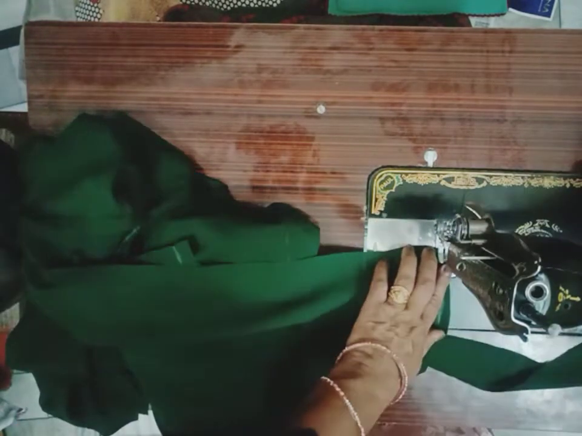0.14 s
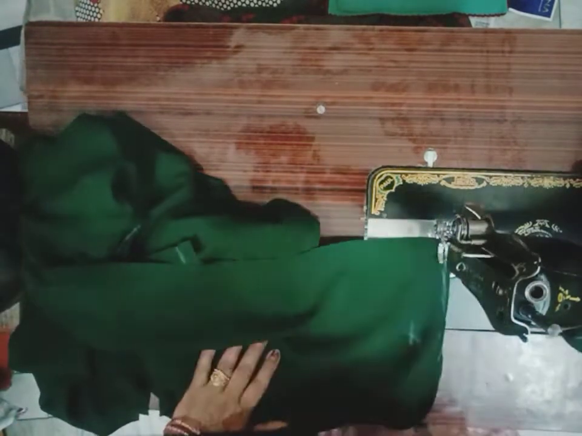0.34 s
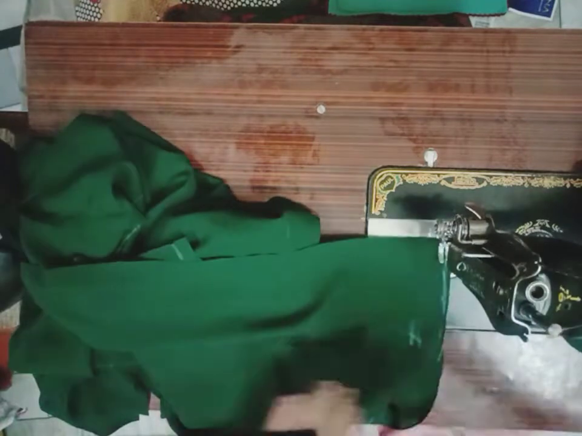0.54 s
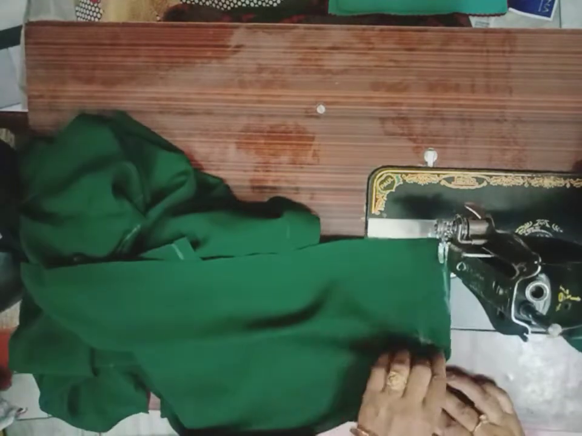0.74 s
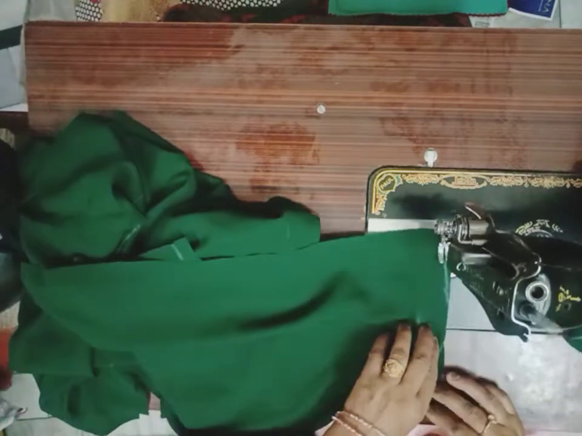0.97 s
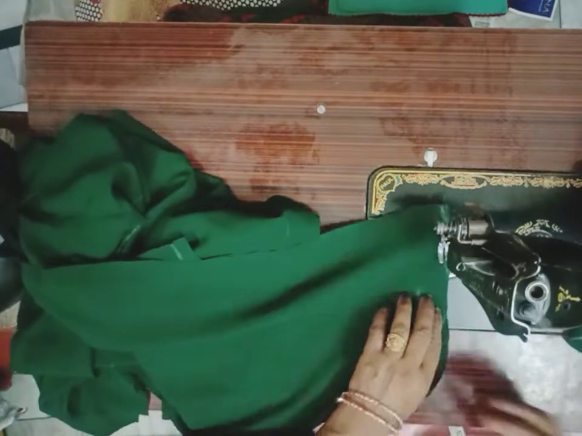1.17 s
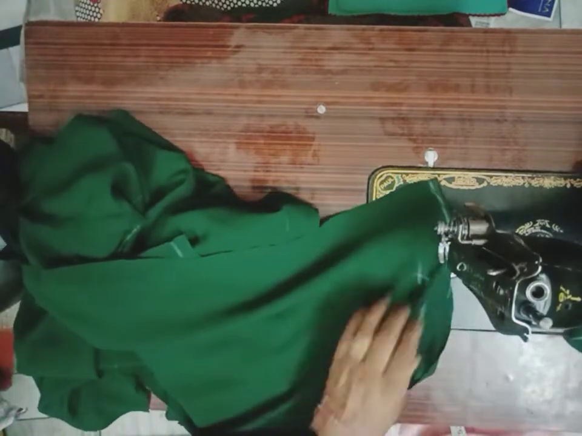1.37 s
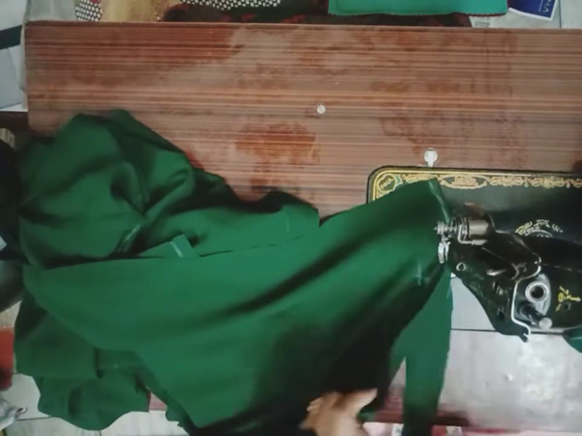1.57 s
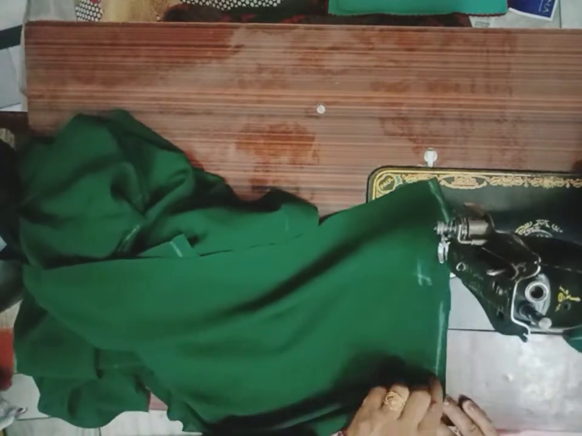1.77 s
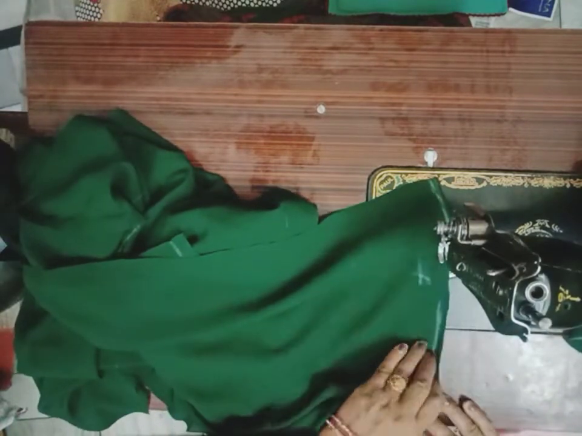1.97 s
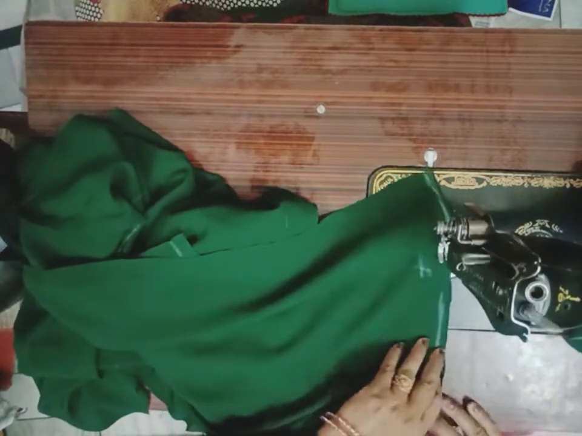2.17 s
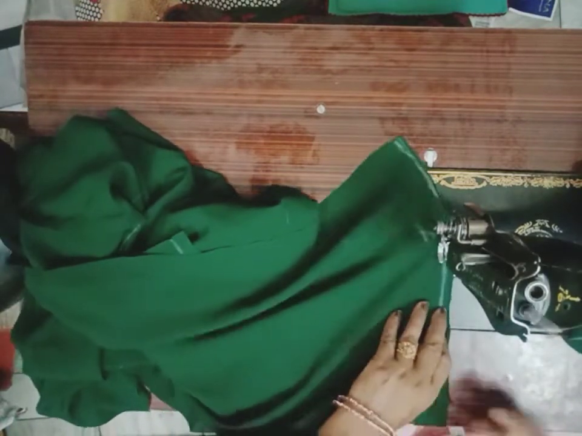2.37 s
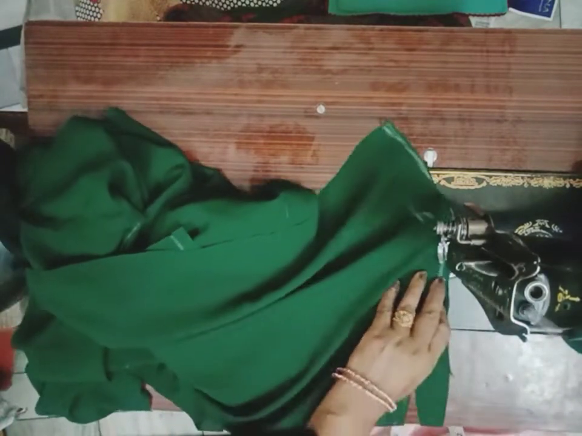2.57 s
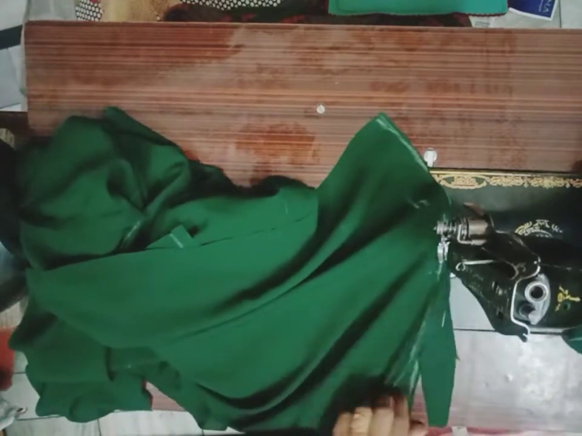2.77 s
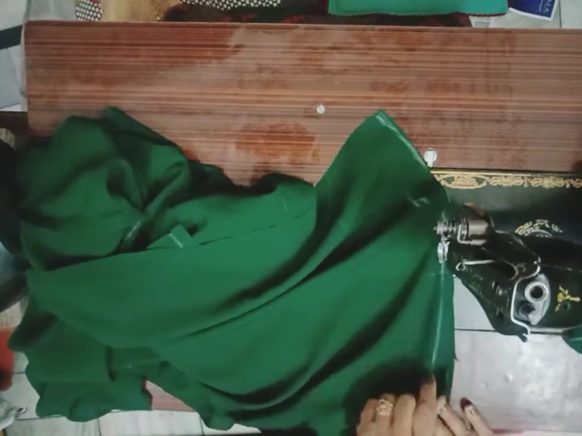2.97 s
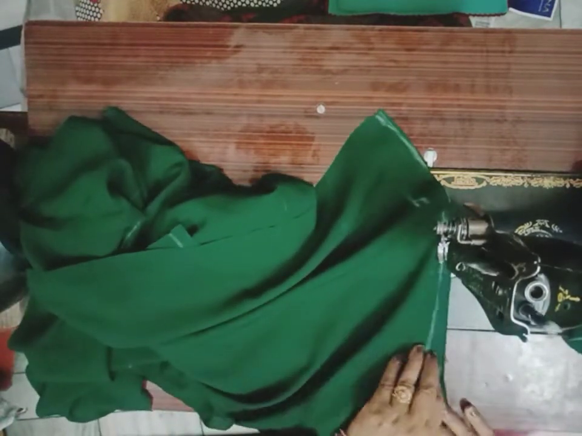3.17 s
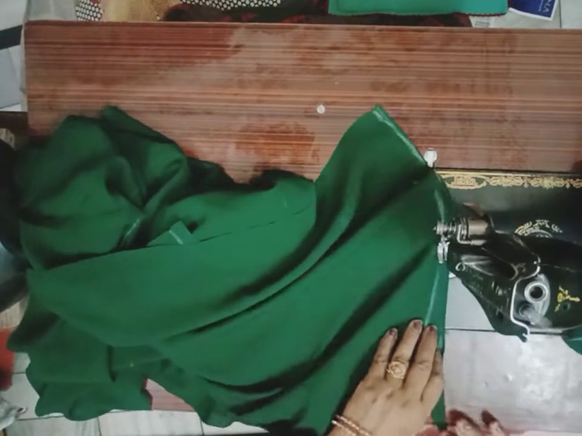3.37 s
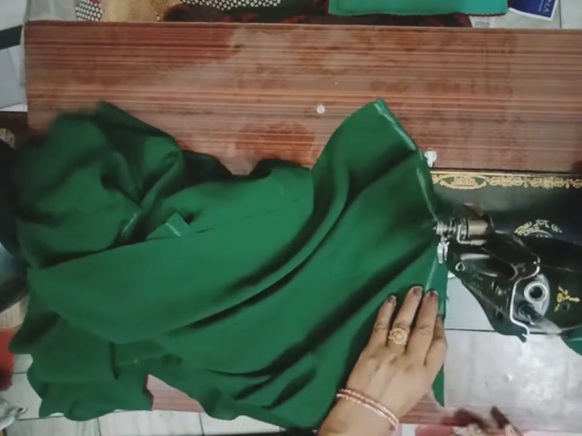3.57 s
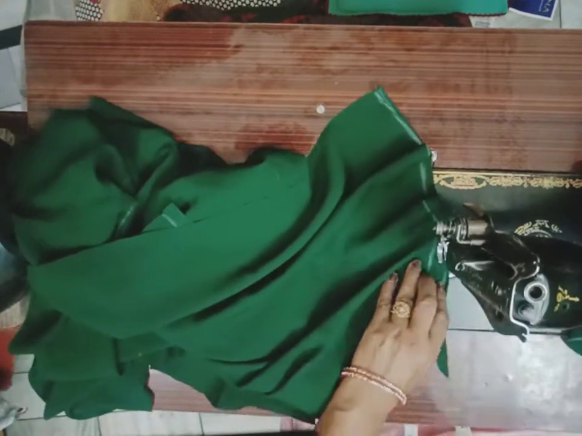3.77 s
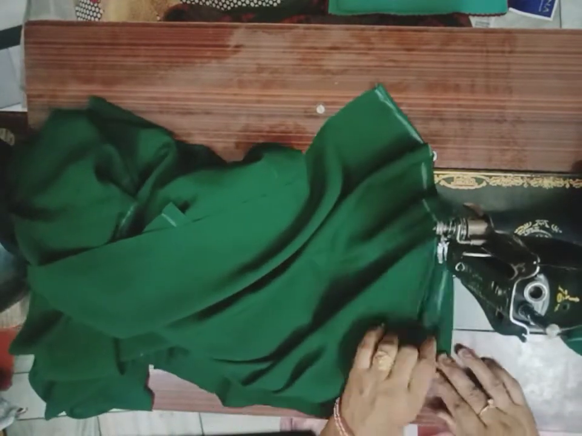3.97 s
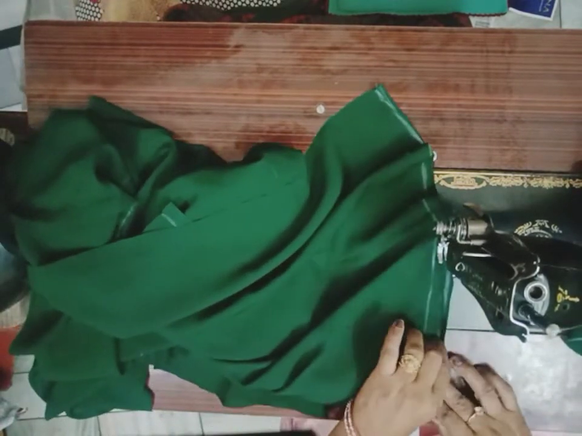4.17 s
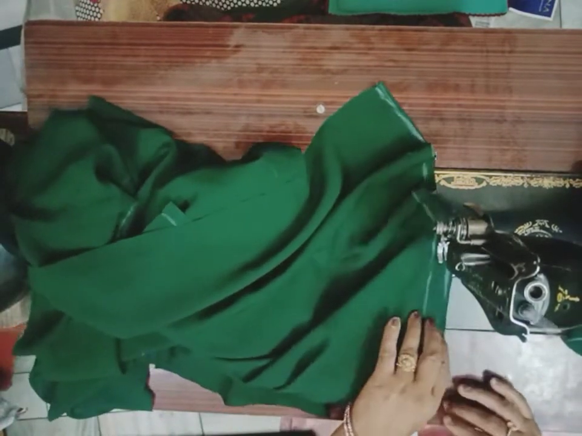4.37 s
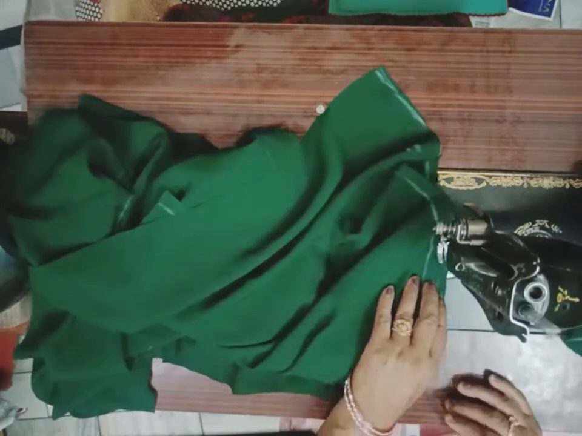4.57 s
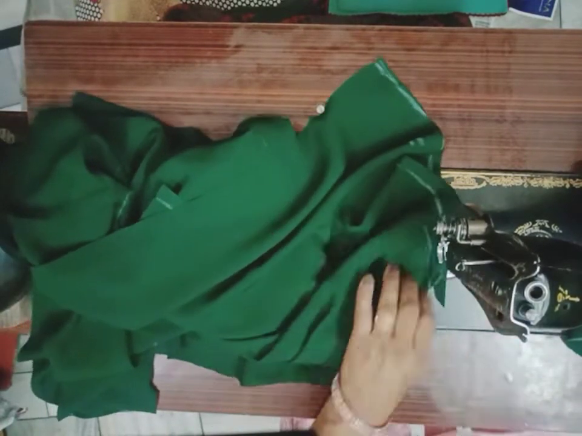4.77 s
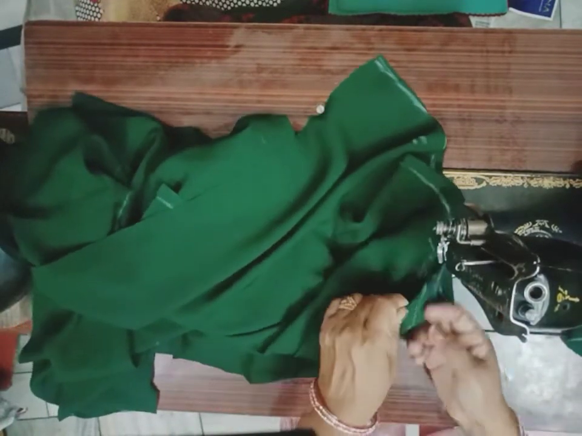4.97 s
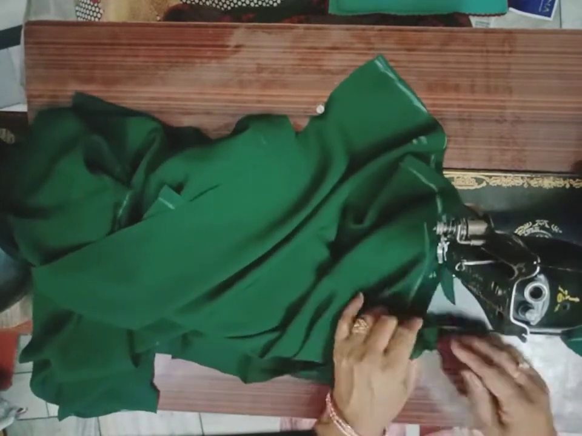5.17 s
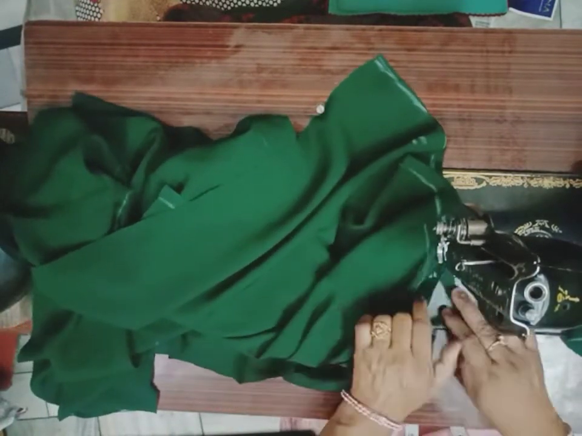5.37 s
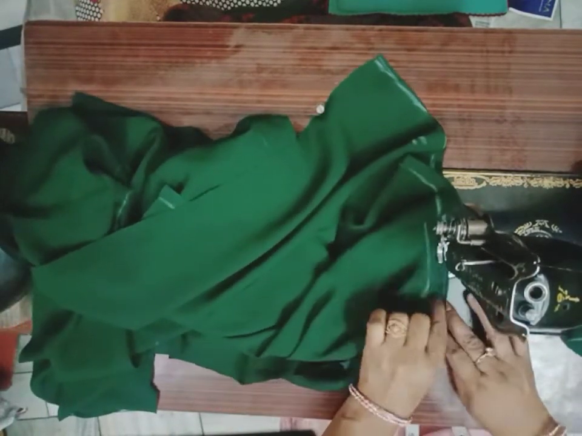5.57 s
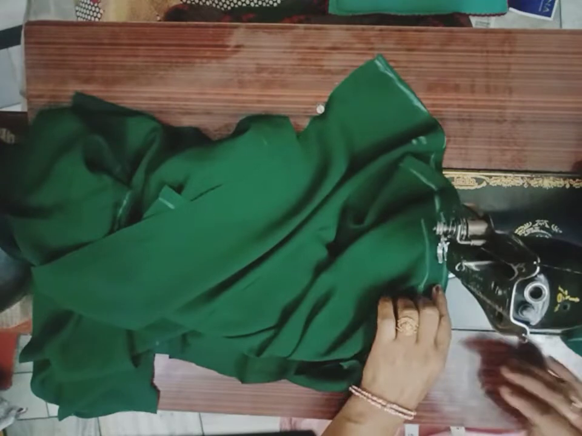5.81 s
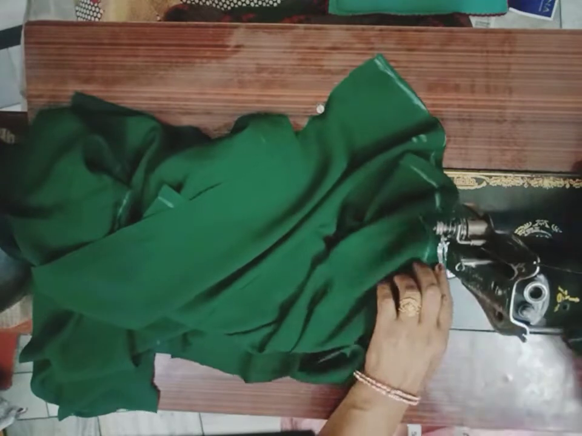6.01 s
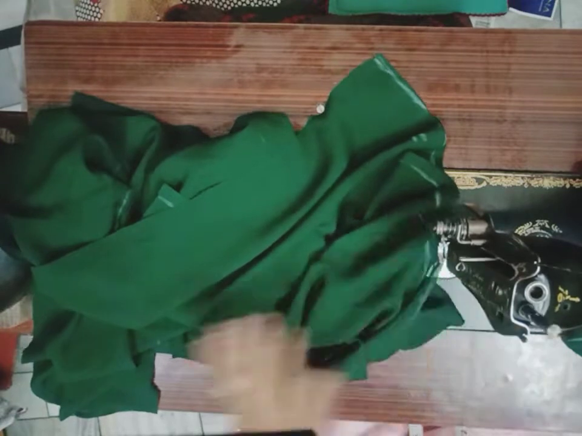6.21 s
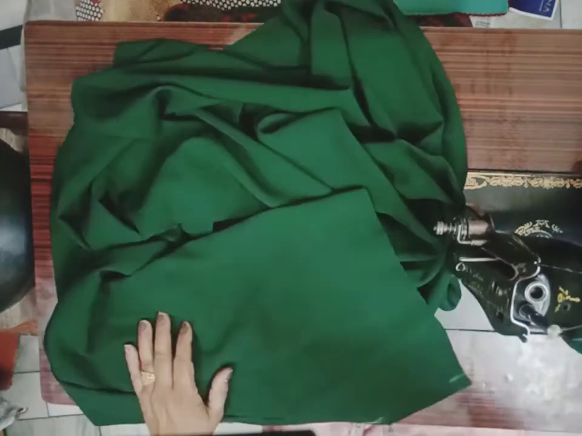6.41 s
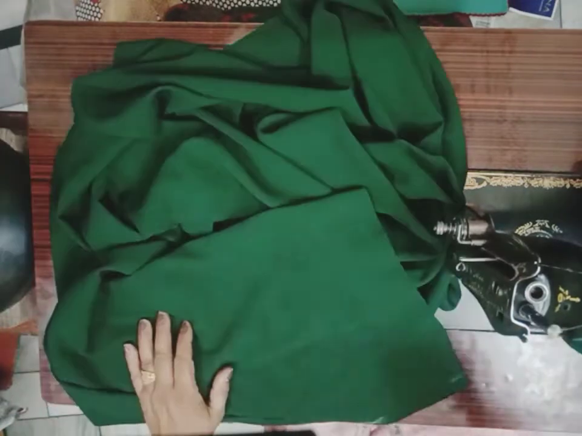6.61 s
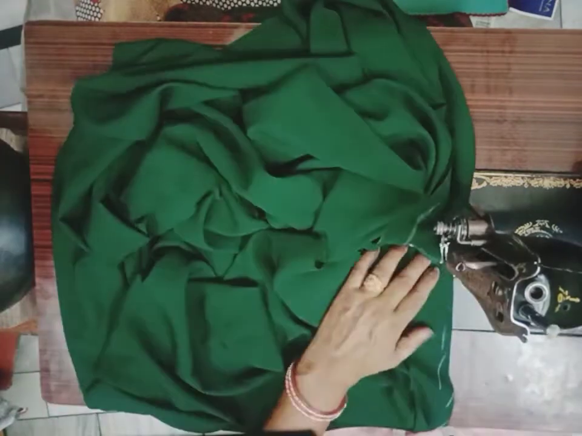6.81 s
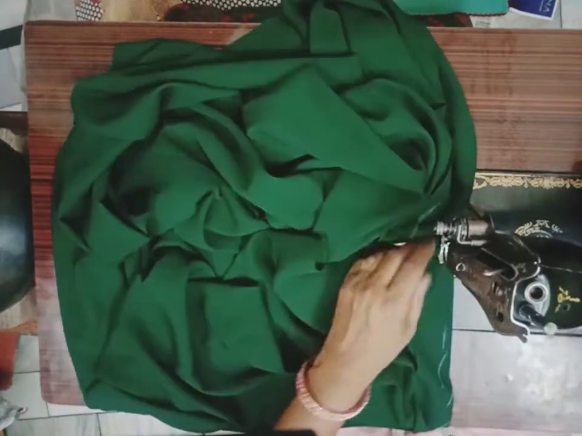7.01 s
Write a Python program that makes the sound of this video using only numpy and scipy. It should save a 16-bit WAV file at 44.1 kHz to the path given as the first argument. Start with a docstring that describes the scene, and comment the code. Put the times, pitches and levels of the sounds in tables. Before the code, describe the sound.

A motor-driven iron sewing machine stitches in five short clattering bursts, each starting with a low hum and ending in a dull knock, in a small room.

```python
"""A motor-driven iron sewing machine on a wooden table stitches in five short bursts, heard close up.
The motor hums as it strains to start; the machine breaks free, speeds up, coasts and stops with a dull knock.
Clacks of needle bar and shuttle shake steel parts and iron case, modelled as resonant bodies under noisy force.
A speed curve per burst scales the light strokes, loose rattle, table rumble and running hum.
Soft grainy rushes, metal ticks, belt squeaks and table thuds stand over the shaped noise of a small room."""
import sys
import numpy as np
from scipy import signal
from scipy.fft import rfft, irfft, next_fast_len
from scipy.io import wavfile
from scipy.ndimage import uniform_filter1d, map_coordinates

SR = 44100
rng = np.random.default_rng(int(sys.argv[2]) if len(sys.argv) > 2 else 0)


def wav_out(sig):
    """Save sig, one row per channel (or a flat mono array), as 16-bit PCM at SR to the path in sys.argv[1]."""
    wavfile.write(sys.argv[1], SR, np.round(np.clip(np.atleast_2d(sig).T, -1, 1) * 32767).astype(np.int16))


N = 310807

# presses of the pedal: (start [s], straining [s], stop [s], pace [strokes/s], steel rattle before trim [dB],
# case clatter before trim [dB], table rumble [dB], starting hum before trim [dB])
BURSTS = [(0.817, 0.071, 1.346, 27, -18, -19.5, -28, -13.5),
          (2.018, 0.06, 2.702, 30, -17.5, -18.5, -25.5, -15), (3.121, 0.072, 3.825, 30, -17, -18, -26, -18),
          (4.185, 0.068, 4.77, 29, -17.5, -18.5, -27, -19.5),
          (5.657, 0.06, 6.196, 24, -20, -20.5, -31, -16.5)]


def amp(db):
    """Gain of a level in dB."""
    return 10 ** (np.asarray(db) / 20)


def unit(x):
    """x scaled to rms 1."""
    return x / np.sqrt(np.mean(x ** 2) + 1e-20)


def along(points, hz):
    """Interpolate (frequency [Hz], value) points on a log frequency axis."""
    f, v = np.transpose(points)
    return np.interp(np.log(hz + 1), np.log(f + 1), v)


def clock():
    """Time of every sample [s]."""
    return np.arange(N) / SR


def wobble(knots_per_s):
    """Smooth random curve through normally distributed knots."""
    knots = rng.standard_normal(int(N * knots_per_s / SR) + 4)
    return map_coordinates(knots, [clock() * knots_per_s])


def filtered(x, response):
    """Filter x by a response given as a function of Hz."""
    size = next_fast_len(N + SR // 2)
    spectrum = rfft(x, size) * response(np.fft.rfftfreq(size, 1 / SR))
    return irfft(spectrum, size)[:N]


def shape(spectrum, modes, hz):
    """Gain of a broad spectrum with resonant peaks standing on it."""
    peaks_db = sum(db / (1 + (2 * (hz - centre) / width) ** 2) for centre, width, db in modes)
    return amp(along(spectrum, hz) + peaks_db)


def noise(spectrum, modes=()):
    """Coloured noise of rms 1."""
    return unit(filtered(rng.standard_normal(N), lambda hz: shape(spectrum, modes, hz)))


def add(track, start_s, sound):
    """Mix a sound into the track in place."""
    part = track[round(start_s * SR):][:len(sound)]
    part += sound[:len(part)]


def contacts(rate_hz, scatter_db, count=4000):
    """Many small impacts, loosely evenly spaced and of uneven strength; rms 1."""
    times_s = (np.arange(count) + rng.random(count)) / rate_hz
    sizes = amp(scatter_db * rng.standard_normal(count))
    return unit(np.bincount((times_s * SR).astype(int), sizes, N)[:N])


def buzz(impacts, t60_s):
    """Envelope (rms 1) of the buzz after each impact: powers add and decay exponentially."""
    power_fade = amp(-60 / (t60_s * SR)) ** 2
    power = signal.lfilter([1], [1, -power_fade], impacts ** 2)
    return unit(np.sqrt(power))


def swells(rows):
    """Envelope of soft events: each peaks after a third of its length, then fades."""
    out = np.zeros(N)
    for start_s, db, length_s in rows:
        u = np.maximum(clock() - start_s, 0) / (length_s / 3)
        out += amp(db) * u * np.exp(1 - u)
    return out


def room_noise():
    """A steady rush with a fluttering hollow drone in it, under a faint hiss."""
    # noise spectra: (frequency [Hz], relative density [dB])
    air = [(18, -80), (30, -34), (105, -9.5), (155, -24.5), (193, -13), (242, -25), (348, -8), (377, -7),
           (409, 7), (491, -8.5), (639, -7), (1020, -3), (2110, -11.5), (2430, -9.5), (3800, -27.5),
           (4940, -45), (8360, -120)]
    hollow = [(280, -32), (380, -16.5), (440, -5.5), (510, -2.5), (660, -45), (3000, -67)]
    hiss = [(2500, -30), (3500, -49), (4400, -13), (5100, -4.5), (6150, -5.5), (6500, 1), (7900, -1),
            (9200, -5.5), (10000, 2), (10700, -13.5), (15500, -28)]
    # room resonances: (frequency [Hz], width [Hz], lift [dB])
    room_modes = [(860, 120, 3), (1520, 130, 4), (2360, 200, 3), (5650, 150, 4), (6530, 200, 4),
                  (7080, 150, 4)]
    rush = amp(-38.5 + 0.24 * wobble(7.3)) * noise(air, room_modes)
    drone_db = -46.5 + 7 * np.tanh(wobble(22))
    drone = amp(drone_db) * noise(hollow)
    return rush + drone + amp(-56.5) * noise(hiss, room_modes)


def walls(x):
    """Short diffuse answer of a small furnished room, changing as hands and cloth move."""
    # decay of the room: (frequency [Hz], t60 [s])
    room_decay = [(150, 0.072), (1000, 0.13), (5000, 0.1), (14000, 0.076)]
    delay_s = .004
    out, size = np.zeros(N), SR // 5
    for start in range(0, N - size, size // 2):  # half-overlapping pieces, each with a new random tail
        hz, t, z = signal.stft(rng.standard_normal(size), SR, nperseg=256)
        t60_s = along(room_decay, hz)[:, None]
        tail = signal.istft(z * amp(-60 * t / t60_s), SR, nperseg=256)[1]
        piece = x[start:start + size] * np.sqrt(np.hanning(size))
        add(out, start / SR + delay_s, signal.fftconvolve(piece, tail / np.linalg.norm(tail)))
    return out


def bumps():
    """Hands and forearms bump the table through the cloth: soft, pitchless thuds about an octave wide."""
    # thuds: (start [s], level [dB], length [s], centre [Hz])
    thuds = [(0.036, -43, 0.023, 112), (0.086, -43, 0.055, 132), (0.165, -46, 0.049, 130),
             (0.711, -41, 0.046, 350), (5.196, -34.5, 0.013, 484), (5.25, -54, 0.017, 435),
             (5.325, -33.5, 0.036, 620), (6.732, -37, 0.021, 443), (6.763, -33, 0.041, 308),
             (6.812, -38, 0.067, 417)]
    out = np.zeros(N)
    for start_s, db, length_s, hz in thuds:
        band = [(hz / 4, -40), (hz / 2, -14), (hz, 0), (hz * 2, -16), (hz * 10, -70)]
        out += swells([(start_s, db, length_s)]) * noise(band)
    return out


def swishes():
    """Soft, grainy rushes, some like fabric sliding, others only faint, brief flickers of hiss."""
    # rushes: (start [s], level [dB], length [s])
    rushes = [(0.637, -40, 0.048), (0.725, -34, 0.043), (1.497, -49, 0.033), (1.672, -44.5, 0.021),
              (2.008, -31, 0.024), (5.325, -35.5, 0.024), (5.375, -51, 0.027), (5.425, -50, 0.029),
              (6.765, -31.5, 0.065), (6.84, -39, 0.096)]
    # rush noise: (frequency [Hz], relative density [dB])
    soft_hiss = [(200, -37), (400, -11), (2500, 3), (4000, -6.5), (6200, -2.5), (7500, -7), (11000, -18),
                 (15500, -29)]
    smooth = swells(rushes) * noise(soft_hiss)
    return smooth * buzz(contacts(rate_hz=270, scatter_db=3.5), t60_s=0.047)


def ticks():
    """Small metal parts ring briefly when touched: decaying sines with a little noise."""
    # light touches: (time [s], level [dB], ring [Hz], t60 [s])
    touches = [(0.513, -20, 7900, 0.034), (0.646, -29.5, 5740, 0.057), (0.647, -38, 3670, .08),
               (1.508, -44, 7770, 0.16), (1.68, -40, 5000, .03), (2.765, -39, 7060, .03),
               (5.325, -17, 9960, 0.0073)]
    rise_s = 0.00049
    out, t = np.zeros(N), np.arange(SR // 5) / SR
    for start_s, db, hz, t60_s in touches:
        ring = np.sin(2 * np.pi * hz * t) + amp(-16.5) * rng.standard_normal(len(t))
        add(out, start_s, amp(db - 60 * t / t60_s) * (1 - np.exp(-t / rise_s)) * ring)
    return out


def squeaks():
    """The drive belt slips: a pure squeal swells and dies."""
    # slips: (start [s], level [dB], length [s])
    slips = [(1.996, -19.5, 0.047), (3.46, -24, 0.051)]
    squeal_hz = 3160
    out = np.zeros(N)
    for start_s, db, length_s in slips:
        t = np.arange(round(length_s * SR)) / SR
        swell = np.sin(np.pi * t / length_s) ** 2
        add(out, start_s, amp(db) * swell * np.sin(2 * np.pi * squeal_hz * t))
    return out


def speed(t, start_s, strain_s, stop_s):
    """Share of full speed in one run: it creeps, breaks free, speeds up, coasts and is braked."""
    creep, free, coast = 0.21, 0.71, 0.67  # shares of full speed
    break_s, spin_up_s, coast_s, brake_s = 0.0064, 0.1, 0.17, 0.028
    strained_s = start_s + strain_s
    free_s = strained_s + break_s
    brake_start_s = stop_s - brake_s
    times_s = [start_s, strained_s, free_s, free_s + spin_up_s, brake_start_s - coast_s, brake_start_s, stop_s]
    return np.interp(t, times_s, [0, creep, free, 1, 1, coast, 0])


def shaking():
    """Gains of rattle, clatter and rumble: each grows with a power of the speed."""
    powers = np.array([[1.01], [0.84], [.8]])
    gains = np.zeros((3, N))
    for start_s, strain_s, stop_s, _, steel_db, case_db, table_db, _ in BURSTS:
        run = speed(clock(), start_s, strain_s, stop_s)
        gains += amp([[steel_db], [case_db], [table_db]]) * run ** powers
    return gains


def table_rumble(rumble, hum):
    """The table top rumbles with the running machine and the straining motor; powers add."""
    # table noise: (frequency [Hz], relative density [dB])
    wood = [(20, -9), (35, -20), (60, -5.5), (100, 6.5), (140, 8.5), (190, 4.5), (240, -18), (400, -15.5)]
    return np.hypot(rumble, amp(-17) * hum) * noise(wood)


def strain():
    """Gain of the motor's hum: strong at each start, weak and uneven in the run, swelling before the stop."""
    rise_s, fall_s = 0.042, 0.033
    stall_db, stall_lead_s, stall_width_s = -20, 0.026, .02
    t, out = clock(), np.zeros(N)
    running = amp(-28.5 + 7.5 * wobble(30))
    for start_s, strain_s, stop_s, *_, hum_db in BURSTS:
        rise = np.sin(np.pi / 2 * np.clip((t - start_s) / rise_s, 0, 1)) ** 2
        fall = np.exp(-np.maximum(t - start_s - strain_s, 0) / fall_s)
        stall = np.exp(-((t - stop_s + stall_lead_s) / stall_width_s) ** 2)
        loaded = amp(hum_db) * rise * fall + amp(stall_db) * stall
        out += np.hypot(loaded, running * speed(t, start_s, strain_s, stop_s))
    return out


def motor(hum):
    """Magnetic hum and its octave: nearly steady in phase while strong, wavering where weak."""
    hum_hz = 150.7
    free = 1 / (1 + (hum / amp(-11.5)) ** 2)  # near 1 where the hum is weak
    phase = 2 * np.pi * hum_hz * clock() + 0.75 * free * wobble(28)
    flutter = amp(-1.5 + 1.2 * wobble(110))
    return flutter * hum * (np.sin(phase) + amp(-22.5) * np.sin(2 * phase))


def stitching():
    """All blows as (s, steel gain, case gain): light strokes fill the gaps between timed ones; a knock ends a run."""
    # individually timed blows of needle bar, shuttle and presser foot, most of them hard:
    # (time [s], steel before trim [dB], case knock before trim [dB])
    timed = [(0.848, -18, -28), (0.9532, -6, -21), (0.9931, -3, -12), (1.028, -5, -24), (1.1792, -1.5, -15),
             (1.253, -3, -11.5), (1.274, -0.5, -19.5), (2.0387, -16, -19.5), (2.0787, -5.5, -16),
             (2.1094, -7.5, -19), (2.182, -1.5, -14.5), (2.3426, -2, -15.5), (2.4044, -10, -35),
             (2.488, -5, -16), (2.5016, -7, -23), (2.5512, -4, -17), (2.604, -3.5, -18),
             (2.6268, -9, -11.5), (3.2, -13, -18), (3.235, -6, -20), (3.264, -6, -20),
             (3.3643, -4.5, -15.5), (3.452, -8, -23), (3.6417, -5, -18), (3.7323, -5.5, -11.5),
             (3.7828, -6, -21), (4.2663, -2, -11.5), (4.3042, -10, -18), (4.339, -4.5, -17),
             (4.3847, -2, -13.5), (4.4083, -3, -13.5), (4.439, -9, -11.5), (4.565, -4.5, -18),
             (4.6, -3.5, -14), (4.6344, -4.5, -17), (4.672, -5.5, -17), (4.7197, -6.5, -21),
             (5.727, -12.5, -21.5), (5.7865, -4, -16.5), (5.8436, -1, -14.5), (5.8947, -3.5, -15.5),
             (5.9304, -3.5, -13.5), (6.013, -1, -12), (6.096, -3.5, -16), (6.1251, -3, -19.5),
             (6.7792, -15, -30)]
    clack_trim_db, knock_trim_db = -8, 1
    stroke_db, stroke_knock_db = -20.5, -20  # light stroke at full speed
    scatter_db, jitter_s = 2.5, .003
    rest_knock_db, rest_lead_s = -22, 0.0223  # last knock, just before standstill
    blows = [(s, amp(db + clack_trim_db), amp(knock_db + knock_trim_db)) for s, db, knock_db in timed]
    for start_s, strain_s, stop_s, rate_hz, *_ in BURSTS:
        free_s, rest_s = start_s + strain_s, stop_s - rest_lead_s
        beats = [free_s] + [s for s, *_ in timed if free_s < s < rest_s] + [rest_s]
        light = []
        for a, b in zip(beats, beats[1:]):
            light.extend(np.linspace(a, b, round((b - a) * rate_hz) + 1)[1:-1])
        for s, (late, *uneven) in zip(light, rng.standard_normal(size=(40, 3))):
            steel, case = speed(s, start_s, strain_s, stop_s) * amp(scatter_db * np.array(uneven))
            blows.append((s + jitter_s * late, steel * amp(stroke_db), case * amp(stroke_knock_db)))
        blows.append((rest_s, 0, amp(rest_knock_db)))
    return blows


def blow(rise_s, hold_s, t60_s):
    """Envelope of one blow: the parts buzz against each other for a moment, then settle."""
    t = np.arange(SR // 10) / SR
    return (1 - np.exp(-t / rise_s)) * amp(-60 * np.maximum(t - hold_s, 0) / t60_s)


def jangle(patchy_db):
    """Contact noise of rms 1 whose colour keeps shifting, as the parts meet at ever new points."""
    z = signal.stft(rng.standard_normal(N), nperseg=512)[2]
    across_hz = uniform_filter1d(rng.standard_normal(z.shape), size=3, axis=0)
    field = uniform_filter1d(across_hz, size=5, axis=1)
    return unit(signal.istft(z * amp(patchy_db * unit(field)), nperseg=512)[1][:N])


def body(force, spectrum, modes, size=16384):
    """A struck part: its causal minimum-phase response of unit energy rings at the modes."""
    cepstrum = irfft(np.log(shape(spectrum, modes, np.fft.rfftfreq(size, 1 / SR))))
    cepstrum[1:size // 2] *= 2  # fold to minimum phase
    cepstrum[size // 2 + 1:] = 0
    response = irfft(np.exp(rfft(cepstrum)))
    return signal.fftconvolve(force, response / np.linalg.norm(response))[:N]


def linkage(rattle, clatter):
    """Clacks over the rattle of loose joints; both shake the steel parts and the iron case."""
    # broad responses: (frequency [Hz], relative gain [dB])
    steel_spectrum = [(2000, -29), (3300, -14), (4200, -10), (4800, -4), (6000, -1), (7000, 0.5),
                      (7500, -2.5), (8000, -8.5), (10300, -14), (11000, -16), (15500, -35)]
    case_spectrum = [(180, -32.5), (240, -4.5), (290, -1), (520, -2), (850, -0.5), (1200, -4), (1600, -5),
                     (1950, -3.5), (2500, -9), (3000, -5), (3900, -12.5), (6000, -25)]
    # resonances: (frequency [Hz], width [Hz], lift [dB])
    steel_modes = [(4711, 150, 5), (5076, 50, 4), (5830, 60, 3), (6132, 70, 6), (6595, 120, 3),
                   (6887, 70, 7), (7020, 70, 4), (10190, 100, 3), (11270, 200, 5), (12400, 180, 5)]
    case_modes = [(312, 40, 3), (438, 25, 3), (621, 35, 4), (705, 50, 3), (881, 45, 3), (937, 28, 5),
                  (1110, 32, 8), (1689, 45, 4), (1835, 50, 5), (1921, 40, 7), (3157, 45, 5)]
    sharp, dull, slack = np.zeros((3, N))
    flight_s = .012
    clack = blow(rise_s=.0005, hold_s=.0028, t60_s=.022)
    knock = blow(rise_s=.0009, hold_s=.004, t60_s=.04)
    for s, steel, case in stitching():
        add(sharp, s, steel * clack)
        add(dull, s, case * knock)
        add(slack, s - .8 * flight_s, np.hanning(round(flight_s * SR)))
    # joints quieten as a part flies across its play, mostly before it lands
    loose = buzz(contacts(rate_hz=220, scatter_db=2.4), t60_s=.035) * amp(-4 * slack)
    on_steel = np.hypot(sharp, amp(-2.0) * rattle * loose) * jangle(patchy_db=1.0)
    on_case = np.hypot(dull, amp(0.5) * clatter * loose) * rng.standard_normal(N)
    return body(on_steel, steel_spectrum, steel_modes) + body(on_case, case_spectrum, case_modes)


def scene():
    """Mix machine, hands, table and room; linkage, ticks and swishes also excite the walls."""
    rattle, clatter, rumble = shaking()
    hum = strain()
    near = linkage(rattle, clatter) + ticks() + swishes()
    table = table_rumble(rumble, hum) + bumps()
    mix = near + amp(-10.5) * walls(near) + squeaks() + motor(hum) + table + room_noise()
    return mix[None]


def record(dry):
    """The highest peaks are rounded off, the level dips once for an instant, and the top is cut."""
    dip_start_s, dip_end_s, dip_db = 6.248, 6.266, -25
    top_hz = 15750
    rounded = dry[0] / (1 + np.abs(dry[0]) ** 6) ** (1 / 6)
    inside = (clock() > dip_start_s) & (clock() < dip_end_s)
    dip = uniform_filter1d(1. * inside, size=64)  # softened edges
    return filtered(rounded * amp(dip_db * dip), lambda hz: hz < top_hz)[None]


dry = scene()
out = record(dry)
wav_out(out)
```